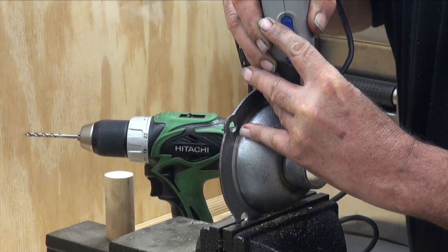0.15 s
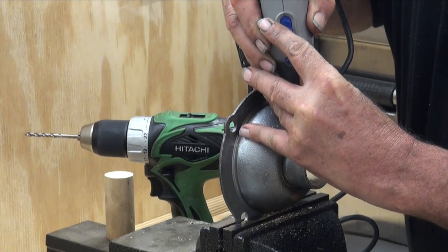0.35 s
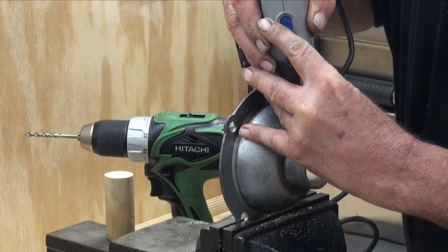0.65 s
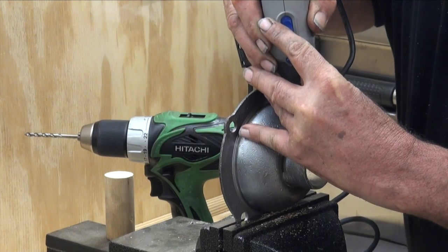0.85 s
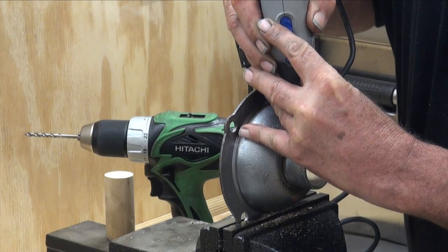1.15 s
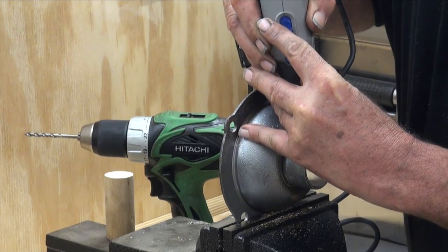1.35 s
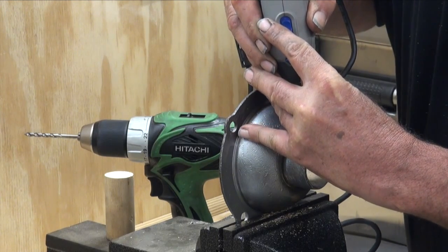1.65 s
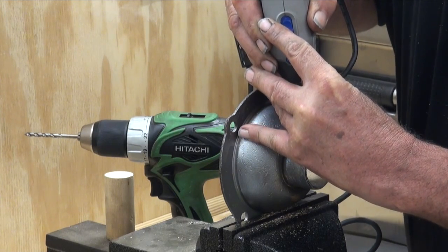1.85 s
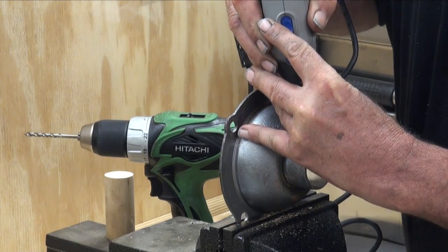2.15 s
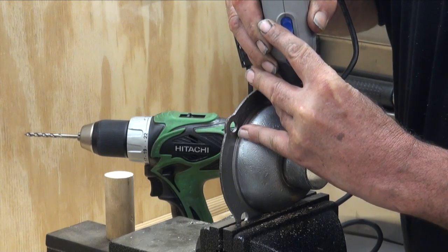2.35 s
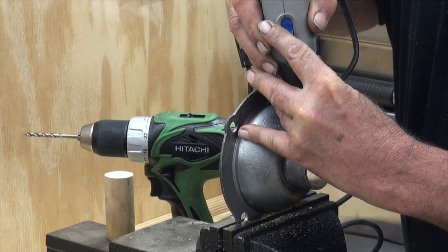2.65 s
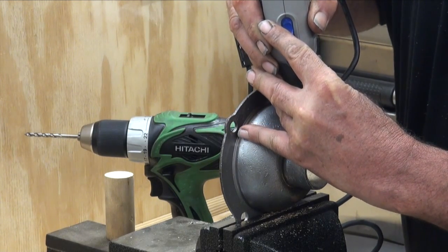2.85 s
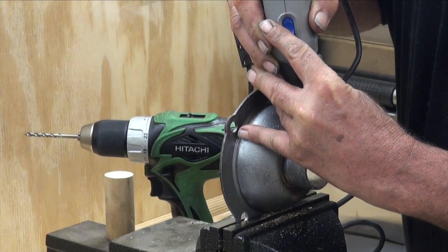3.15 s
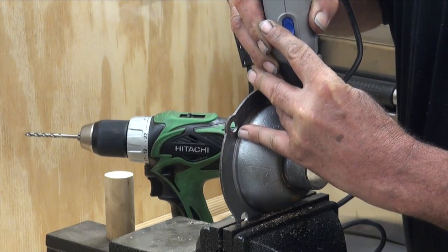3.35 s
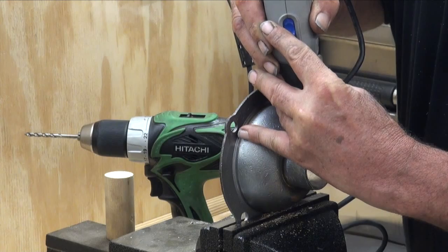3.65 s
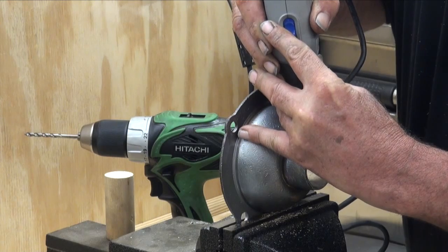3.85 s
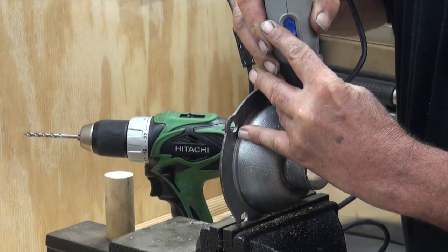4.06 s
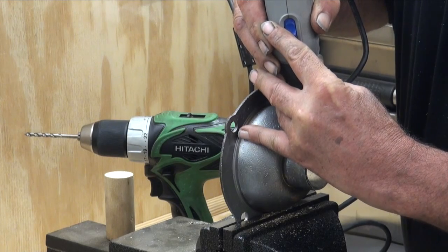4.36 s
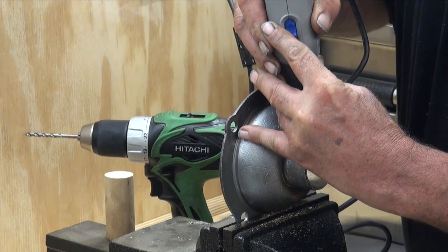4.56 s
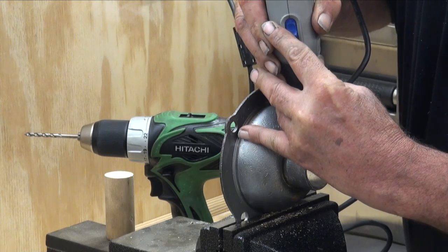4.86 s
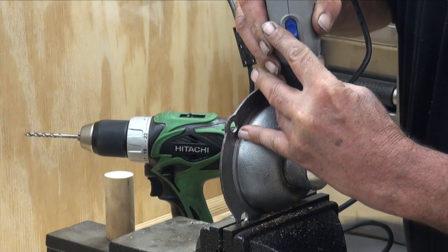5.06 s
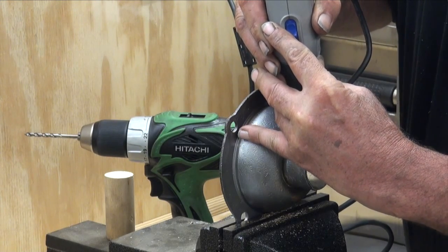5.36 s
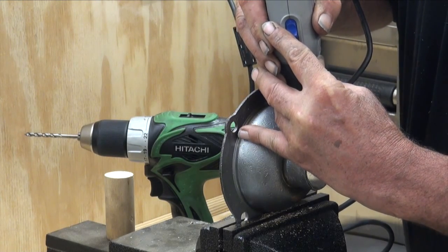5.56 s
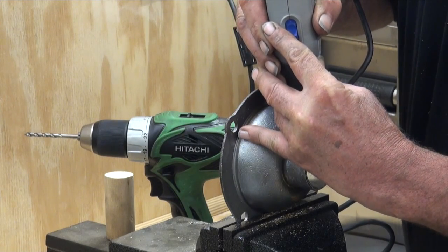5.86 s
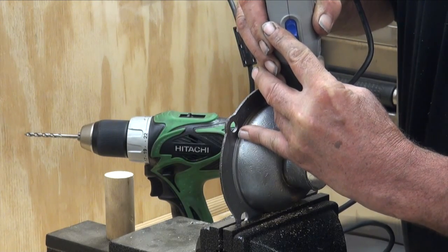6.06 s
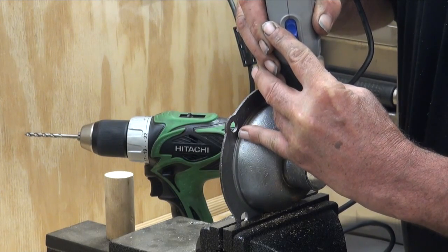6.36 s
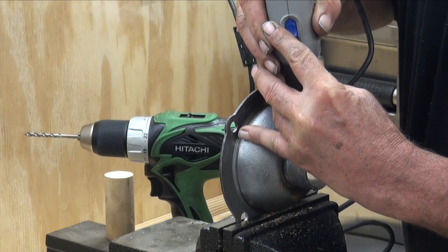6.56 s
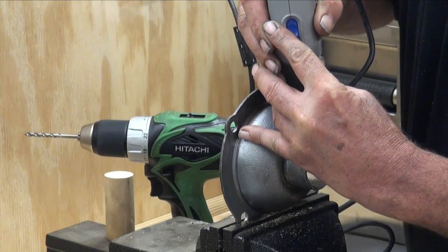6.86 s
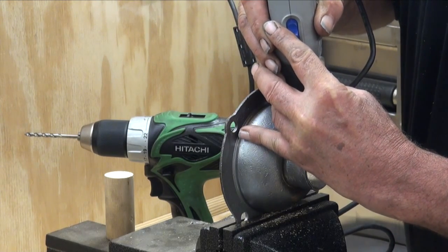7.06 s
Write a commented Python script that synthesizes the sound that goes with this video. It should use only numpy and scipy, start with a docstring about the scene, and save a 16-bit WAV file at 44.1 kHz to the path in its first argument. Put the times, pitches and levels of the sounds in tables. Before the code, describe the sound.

A small high-speed rotary tool cuts soft metal held in a workshop vice. Its high whine runs throughout, sagging slightly under load over a steady hiss from the fan and the cut. The bit chatters in short, shrill squeals, and the metal sings in uneven bursts that are strongest around the middle. Near the end the cutter breaks through and spins more freely. The sound is close and nearly mono.

```python
"""A small mains rotary tool, spinning about 350 times a second, cuts soft metal held in a vice.
Its whine is made of overtones (multiples of the spin speed) that sag in pitch under load.
The metal sings on the sixth one whenever the cutting edges dig in. Bit and metal also ring and
squeal at their own fixed pitches, the cut and the cooling fan hiss, and the bench rumbles and bumps.
Near the end the cutter breaks through and runs free. The sound is close and nearly mono."""
import sys
import numpy as np
from scipy import signal
from scipy.fft import rfft, irfft
from scipy.io import wavfile
from scipy.ndimage import uniform_filter1d

SR = 44100
rng = np.random.default_rng(int(sys.argv[2]) if len(sys.argv) > 2 else 0)


def to_wav(sig):
    """Store sig (one row per channel, or 1-D mono) as 16-bit WAV at the path in sys.argv[1].

    Samples outside -1..1 are clipped; the rate is SR.
    """
    pcm = np.clip(np.atleast_2d(sig), -1, 1) * 32767
    pcm = np.round(pcm).astype(np.int16)
    wavfile.write(sys.argv[1], SR, pcm.T)  # frames by channels


N = 317961
TIME = np.arange(N) / SR  # [s]


def gain_of(db):
    """Turns decibels into a number to multiply a sound by."""
    return 10 ** (np.asarray(db) / 20)


def normalised(x):
    """Scales a signal to an average size (rms) of 1."""
    return x / np.sqrt(np.mean(x ** 2) + 1e-20)


def curve(table):
    """Joins (time, value) points with straight lines, giving a value for every sample."""
    return np.interp(TIME, *np.transpose(table))


def wander(hz, order=2):
    """A random wobble of size 1, up to about hz times a second; a higher order is smoother."""
    spectrum = rfft(rng.standard_normal(N)) / (1 + (np.fft.rfftfreq(N, 1 / SR) / hz) ** order)
    return normalised(irfft(spectrum, N))


def add(mix, start_s, sound):
    """Mixes a sound in at the given time."""
    part = mix[max(round(start_s * SR), 0):][:len(sound)]
    part += sound[:len(part)]


def tone(cycles):
    """A pure tone of size 1 that follows a running count of cycles."""
    return np.sqrt(2) * np.sin(2 * np.pi * (cycles + rng.random()))


def noise(colour, patchy_db):
    """Noise shaped by (frequency, level) points, with drifting louder and softer patches."""
    frames, hz = N // 256 + 5, np.fft.rfftfreq(1024, 1 / SR)
    real, imaginary, patches = rng.standard_normal((frames, 513, 3)).T
    patches = uniform_filter1d(patches, size=16, axis=0)  # smooth across pitch
    patches = normalised(uniform_filter1d(patches, size=7, axis=1))  # and across time
    point_hz, point_db = np.transpose(colour)
    colour_db = np.interp(np.log(hz + 1), np.log(point_hz + 1), point_db)[:, None]
    spectra = (real + 1j * imaginary) * gain_of(colour_db + patchy_db * patches)
    return normalised(signal.istft(spectra, nperseg=1024, noverlap=768)[1][:N])


# How fast the shaft spins: (time [s], speed [turns per second])
SPIN_SPEED = [(0.1, 356.0), (0.28, 363.0), (0.43, 359.0), (0.75, 358.5), (1.03, 352.0), (1.27, 355.5),
              (1.62, 346.3), (1.74, 352.0), (1.98, 347.8), (2.18, 338.5), (2.47, 348.0), (2.83, 340.6),
              (3.15, 347.2), (3.26, 337.8), (3.38, 333.4), (3.62, 351.5), (3.85, 338.5), (4.25, 353.6),
              (4.42, 353.8), (4.58, 346.0), (4.99, 355.0), (5.12, 352.5), (5.27, 356.6), (5.43, 348.8),
              (5.66, 359.3), (5.84, 356.3), (6.03, 360.0), (6.17, 356.8), (6.33, 357.3), (6.6, 351.6),
              (6.75, 356.0), (7.21, 361.8)]


def shaft_turns():
    """Counts the turns so far; the rotor's weight smooths each change of speed."""
    return np.cumsum(uniform_filter1d(curve(SPIN_SPEED), size=2000)) / SR


# The metal's quiet singing between bursts: (time [s], level [dB])
SINGING_DRONE = [(0.0, -43), (0.65, -41), (0.85, -49.5), (2.3, -48), (2.47, -30.5), (3.08, -30.5),
                 (3.18, -39.5), (3.7, -34.5), (4.05, -26.5), (4.33, -35), (4.47, -24), (5.05, -41.5),
                 (5.2, -41.5), (6.0, -51.5), (6.3, -39.5), (6.7, -42), (6.95, -56), (7.2, -47)]
# Bursts of singing as the edges dig in: (middle time [s], level [dB], length [s])
SINGING_BURSTS = [(0.212, -34.5, 0.021), (0.321, -31, 0.026), (0.412, -36, 0.023), (0.65, -43, 0.022),
                  (1.261, -35.5, 0.028), (1.546, -19.5, 0.023), (1.615, -25.5, 0.035), (2.124, -32, 0.018),
                  (2.358, -33.5, 0.017), (2.507, -27, 0.044), (2.677, -31, 0.048), (3.259, -27, 0.034),
                  (3.372, -26, 0.034), (3.497, -20, 0.069), (3.68, -27.5, 0.012), (3.845, -17.5, 0.073),
                  (4.163, -22.5, 0.12), (4.531, -15, 0.011), (4.635, -23, 0.0085), (4.752, -23, 0.088),
                  (4.923, -18.5, 0.041), (5.01, -20.5, 0.055), (5.128, -22.5, .02), (5.246, -26.5, 0.014),
                  (5.374, -29.5, 0.026), (5.498, -34, 0.034), (5.595, -30.5, 0.021), (5.71, -25.5, 0.025),
                  (5.781, -31, .02), (5.852, -31, 0.021), (5.913, -34, 0.0081), (6.046, -27.5, 0.004),
                  (6.082, -26.5, 0.0051), (6.14, -32.5, 0.11), (6.228, -27, 0.0054), (6.444, -31, 0.064),
                  (6.553, -26, 0.058), (6.643, -32, 0.031), (6.843, -30.5, 0.092)]


def singing_db():
    """How loudly the metal sings: the drone, plus bursts that rise slowly and fall faster."""
    level = gain_of(curve(SINGING_DRONE))
    for middle_s, db, length in SINGING_BURSTS:
        peak_s = middle_s + 0.27 * length
        t = TIME[round((peak_s - 4 * length) * SR):round((peak_s + 4 * length) * SR)]
        steepness = np.where(t < peak_s, 0.8, 2.2)
        shape = np.exp(-steepness * abs((t - peak_s) / length) ** 2.07)
        add(level, t[0], gain_of(db) * shape)
    return 20 * np.log10(level)


def cutter_push(smooth_samples):
    """How hard the cutter is pushed, from 0 to 1: louder singing means a harder push."""
    return np.clip(uniform_filter1d(singing_db(), size=smooth_samples) / 25 + 2.073, 0, 1)


def chip_strain(tears_per_s):
    """A random strain that builds up and lets go at once, like a metal chip tearing off."""
    tears = rng.exponential(1, N) * (rng.random(N) < tears_per_s / SR)
    # a fade run backwards becomes a build-up before each tear
    strain = signal.lfilter([1], [1, -np.exp(-1 / (0.016 * SR))], tears[::-1])[::-1]
    strain = uniform_filter1d(strain, size=60)
    return normalised(strain - strain.mean())


def metal_singing(turns, push):
    """The metal sings at six times the spin speed; uneven chips shake the note and roughen it."""
    roughness = 1 + 0.12 * push * wander(187, order=6)
    tearing_db = 1.2 * np.minimum(chip_strain(tears_per_s=45), 2.5)
    catching_db = 3.5 * (1 - push) * wander(9, order=4)  # a light push catches and lets go
    jitter = 0.04 * push * wander(172, order=6)
    return gain_of(singing_db() + tearing_db + catching_db) * roughness * tone(6 * turns + jitter)


# Overtones that swell for a while: (time [s], multiple of the spin speed, boost [dB], length [s])
OVERTONE_SWELLS = [(1.063, 12, 8, 0.059), (1.825, 12, 8.5, 0.23), (3.05, 14, 7, 0.12),
                   (3.902, 28, 13.5, 0.32), (4.535, 12, 9, 0.089), (4.9, 24, 5, .3)]


def swell_db(multiple):
    """An overtone grows louder as it passes a pitch at which the metal likes to ring."""
    return sum(db * np.exp(-((TIME - peak_s) / length) ** 2)
               for peak_s, swelling, db, length in OVERTONE_SWELLS if round(swelling) == multiple)


def ease_off_db():
    """Two brief dips in level as the cutter eases off the metal."""
    return -7 * sum(np.exp(-((TIME - dip_s) / 0.035) ** 2) for dip_s in (1.975, 5.3))


# The tones of the tool's housing: (multiple of the spin speed, roughness [0-1], level [dB],
# change at full push [dB], at full depth [dB], once the metal thins [dB], once running free [dB])
HOUSING_TONES = [(2, 0.13, -55, -1.5, 2.5, -12, 26), (3, 0.42, -59, 0.5, 2, -3.5, 8),
                 (4, 0.57, -61.5, -0.5, 7, 9.5, 2), (5, 0.7, -81, 2, 36.5, -11.5, 6.5),
                 (8, 0.3, -56.5, 14, -7, -1, 6.5), (12, 0.37, -45.5, 4, -5, 4, -0.5)]


def housing_hum(turns, push):
    """The housing hums in the hands, changing as the cut deepens and then breaks through."""
    full_depth_s, thin_s, free_s, change_s = 6.5, 6.52, 6.91, 0.04
    depth = np.minimum(TIME / full_depth_s, 1)
    thin = (1 + np.tanh((TIME - thin_s) / change_s)) / 2
    free = (1 + np.tanh((TIME - free_s) / change_s)) / 2
    unsteady = 1 - 0.7 * free  # the hum clears up once nothing is being cut
    out = np.zeros(N)
    for multiple, rough, base_db, push_db, depth_db, thin_db, free_db in HOUSING_TONES:
        db = base_db + push_db * push + depth_db * depth + thin_db * thin + free_db * free
        db += swell_db(multiple) + ease_off_db() * (multiple > 3)
        flicker_db = min(0.5 * multiple, 2.5) * wander(13.3, order=4) + 2.0 * wander(5.7)
        roughness = 1 + unsteady * min(rough, 0.45) * wander(116)
        out += gain_of(db + unsteady * flicker_db) * roughness * tone(multiple * turns)
    return out


# The tones of the whine: (multiple of the spin speed, level against the load level [dB])
WHINE_TONES = [(1, -37), (10, -30.5), (11, -32.5), (14, -25), (15, -25.5), (16, -24), (17, -23.5),
               (18, -35), (20, -18), (21, -16), (22, -17.5), (24, -24), (25, -23), (26, -24), (28, -31),
               (30, -41.5)]


def shaft_whine(turns, push, load_db):
    """The spinning shaft whines; each overtone flickers by itself as the edges bite unevenly."""
    out = np.zeros(N)
    for multiple, db in WHINE_TONES:
        flicker = np.minimum(wander(8 if multiple < 16 else 18.3, order=4), 1.5)
        flicker_db = min(1.3 + 0.46 * multiple, 5.0) * flicker
        push_db = 3.4 * push * (multiple % 2 == 0)  # two cutting edges favour the even multiples
        level = gain_of(load_db + db + push_db + swell_db(multiple) + flicker_db)
        jitter = 0.0028 * multiple * wander(64)
        out += level * tone(multiple * turns + jitter)
    return out


# Side tones from the mains: (multiple of the spin speed, distance above it [Hz], level [dB])
MAINS_TONES = [(1, 120, -74.5)]


def mains_ripple(turns):
    """Mains power drives the motor in pulses, adding a faint tone beside the spin's own."""
    return sum(gain_of(db + 1.9 * wander(7.7)) * tone(multiple * turns + offset_hz * TIME)
               for multiple, offset_hz, db in MAINS_TONES)


# Where bit and metal ring: (pitch [Hz], width [Hz], level against the load level [dB])
BIT_RINGS = [(5635, 19, -15.5), (6376, 42, -9), (9140, 500, -21.5)]
# Two very high rings that come and go: (pitch [Hz], width [Hz])
HIGH_RINGS = [(10310, 81), (12190, 99)]
# How loud the lower and the upper of those two are: (time [s], level [dB])
LOWER_RING_LEVEL = [(0.1, -56), (1.2, -56.5), (2.7, -51), (4.0, -57), (5.6, -75), (6.22, -52.5), (7.2, -58)]
UPPER_RING_LEVEL = [(0.15, -58), (0.5, -47.5), (1.28, -64), (1.75, -46), (2.15, -62), (2.45, -51.5),
                    (3.1, -48.5), (3.5, -57), (4.3, -56), (4.58, -52), (5.1, -62), (5.35, -53), (5.9, -59),
                    (6.4, -57), (6.65, -42), (7.2, -52)]


def bit_ringing(load_db):
    """The random scraping of the cut keeps bit and metal ringing at their own fixed pitches."""
    out = np.zeros(N)
    levels = [load_db + db for *_, db in BIT_RINGS] + [curve(LOWER_RING_LEVEL), curve(UPPER_RING_LEVEL)]
    for (hz, width, *_), db in zip(BIT_RINGS + HIGH_RINGS, levels):
        ring = wander(width / 2) * tone(hz * TIME) + wander(width / 2) * tone(hz * TIME + 0.37)
        flicker_db = (5 if hz > 1e4 else 3) * np.minimum(wander(12), 1.4)
        out += gain_of(db + flicker_db) * normalised(ring)
    return out


# The tone colour of the fan's wind and of chips tearing off: (frequency [Hz], relative level [dB])
FAN_COLOUR = [(400, -28), (1000, -10), (1600, -22.5), (2200, -1.5), (2700, -22), (3750, -9), (4050, 0.5),
              (5200, -5.5), (7200, 7.5), (8200, -9.5), (9200, -4), (11000, -18), (12600, -16.5),
              (14500, -79)]
SCRAPE_COLOUR = [(1500, -32), (2000, 7.5), (3600, -2), (4600, -20)]


def fan_and_cut_hiss(load_db):
    """Fan wind and a duller scrape that follows the push, both puffing once each turn."""
    puffs = 1 + 0.088 * tone(shaft_turns())
    wind = gain_of(load_db - 4.5 + 0.8 * wander(60)) * noise(FAN_COLOUR, patchy_db=2.4)
    scrape_db = 11.8 * cutter_push(smooth_samples=6000) - 58.5
    scrape = gain_of(scrape_db) * noise(SCRAPE_COLOUR, patchy_db=4.0)
    return (wind + scrape) * puffs * gain_of(ease_off_db())


# How the bench's rumble rises and falls: (time [s], level change [dB])
RUMBLE_CHANGES = [(0.2, 2.5), (1.1, -1), (1.6, 6), (2.1, 2.5), (3.6, -1.5), (4.6, 3), (6.1, 5), (7.2, 2)]


def bench_rumble():
    """The bench gives a faint, low, lumpy rumble."""
    # (frequency [Hz], relative level [dB])
    colour = [(25, -45), (60, -34), (170, -0.5), (400, 1), (900, -18)]
    db = -64.5 + curve(RUMBLE_CHANGES) + 2.5 * wander(14)
    return gain_of(db) * noise(colour, patchy_db=1.5)


# Short squeals of the chattering bit: (peak time [s], pitch [Hz], level [dB], length [s])
CHATTER_SQUEALS = [(0.03, 4290.0, -21.0, 0.026), (0.074, 4260.0, -23.0, 0.046),
                   (0.157, 6370.0, -19.0, 0.017), (0.192, 4310.0, -26.0, 0.023),
                   (0.345, 4330.0, -23.0, 0.032), (0.463, 7150.0, -26.0, 0.017),
                   (0.558, 6370.0, -26.0, 0.019), (1.138, 6370.0, -22.0, 0.023),
                   (1.191, 6370.0, -22.0, 0.026), (1.253, 6350.0, -22.0, 0.028),
                   (1.353, 6350.0, -19.0, 0.033), (1.439, 5580.0, -20.0, 0.022),
                   (1.476, 5580.0, -17.0, 0.029), (1.633, 4130.0, -24.0, 0.022),
                   (1.691, 5580.0, -14.0, 0.023), (1.736, 6350.0, -15.0, 0.03),
                   (1.821, 5580.0, -23.0, 0.017), (1.881, 6350.0, -20.0, 0.02),
                   (1.924, 5560.0, -22.0, 0.036), (2.011, 5580.0, -25.0, 0.023),
                   (2.463, 5600.0, -26.0, 0.041), (2.508, 5580.0, -21.0, 0.02),
                   (2.746, 10290.0, -29.0, 0.017), (3.438, 6350.0, -25.0, 0.017),
                   (3.802, 6370.0, -28.0, 0.022), (4.207, 6350.0, -21.0, 0.061),
                   (4.61, 5560.0, -25.0, 0.051), (4.72, 5580.0, -27.0, 0.02), (4.883, 6350.0, -26.0, 0.019),
                   (4.953, 6370.0, -24.0, 0.038), (5.09, 6350.0, -20.0, 0.048),
                   (5.576, 6370.0, -28.0, 0.025), (5.775, 12170.0, -26.0, 0.012),
                   (5.83, 6350.0, -21.0, 0.044), (6.498, 4240.0, -26.0, 0.048),
                   (6.549, 9150.0, -28.0, 0.022), (6.586, 12210.0, -32.0, 0.029),
                   (6.622, 7000.0, -25.0, 0.035), (6.656, 7020.0, -26.0, 0.025),
                   (6.815, 6400.0, -24.0, 0.038), (6.873, 12190.0, -25.0, 0.015),
                   (6.912, 1785.0, -33.0, 0.022), (6.996, 12190.0, -30.0, 0.033),
                   (7.147, 6350.0, -18.0, 0.032), (7.184, 5790.0, -23.0, 0.029)]


def bit_squeals():
    """The bit chatters in short squeals, each at its own pitch: each slightly rough squeal grows, then is
    choked off faster."""
    out = np.zeros(N)
    for peak_s, hz, db, length in CHATTER_SQUEALS:
        t = np.arange(max(peak_s - 5.5 * length, 0), peak_s + 2 * length, 1 / SR)
        steepness = np.where(t < peak_s, 1.9, 2.8)
        shape = np.exp(-steepness * abs((t - peak_s) / length) ** 1.76)
        add(out, t[0], gain_of(db - 0.5) * shape * np.sin(2 * np.pi * hz * t))
    return out * (1 + 0.33 * wander(90))


# Soft bumps through the bench: (time [s], relative level [dB])
BENCH_BUMPS = [(0.334, -47), (0.553, -52), (1.474, -50), (5.258, -50), (5.575, -50), (5.691, -53),
               (6.009, -52), (6.085, -51)]


def bench_bumps():
    """Low shoves pass through the bench and die away too fast to ring."""
    out = np.zeros(N)
    t = np.arange(1500) / SR
    bump = np.sin(2 * np.pi * 160 * t) * (t / 0.01) * np.exp(1 - t / 0.0031)
    for start_s, db in BENCH_BUMPS:
        add(out, start_s, gain_of(db + 7.5) * bump)
    return out


# The load level, which the whine, the bit's ringing and the fan follow: (time [s], level [dB])
LOAD_LEVEL = [(0.0, -29), (0.3, -32), (1.8, -30), (2.2, -30.5), (2.5, -30.5), (5.02, -31), (5.15, -32.5),
              (6.14, -33.5), (6.61, -30), (7.21, -35)]


def scene():
    """Adds up all the sounds, with left and right almost the same."""
    load_db = curve(LOAD_LEVEL)
    turns = shaft_turns() + 0.012 * wander(10, order=4)
    push = cutter_push(smooth_samples=12000)
    mix = metal_singing(turns, push) + housing_hum(turns, push)
    mix += shaft_whine(turns, push, load_db) + mains_ripple(turns)
    mix += bit_ringing(load_db) + fan_and_cut_hiss(load_db)
    mix += bench_rumble() + bit_squeals() + bench_bumps()
    side = gain_of(-47) * np.roll(mix, 300) * wander(20)  # a faint, wavering delayed copy makes left and right differ slightly
    return np.array([mix + side, mix - side])


def record(dry):
    """The microphone loses the deep bass, and the very highest treble is cut off."""
    bass_cut_hz, treble_cut_hz = 90, 14400
    thinned = signal.sosfilt(signal.butter(2, bass_cut_hz, "high", fs=SR, output="sos"), dry)
    treble_filter = signal.firwin(511, treble_cut_hz, window=("kaiser", 9), fs=SR)
    return signal.oaconvolve(thinned, treble_filter[None], "same")


dry = scene()
out = record(dry)
to_wav(out)
```